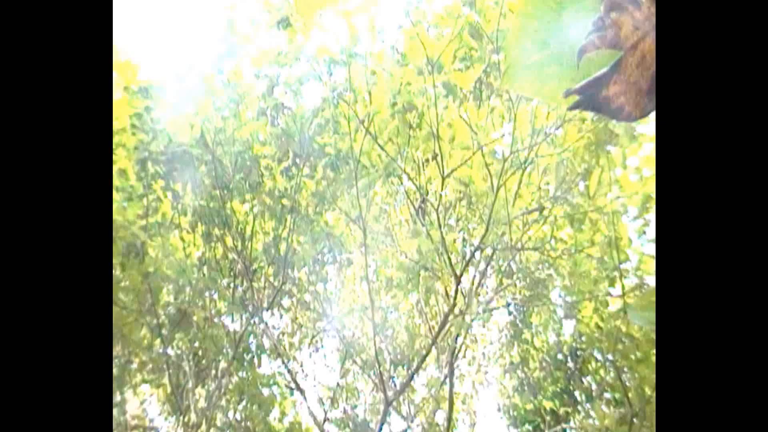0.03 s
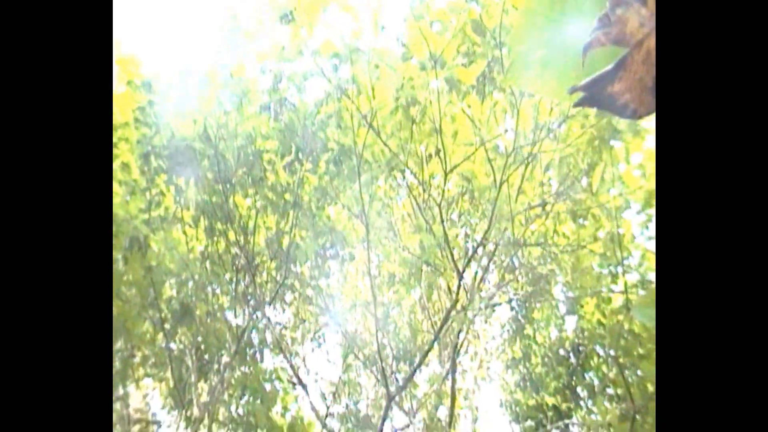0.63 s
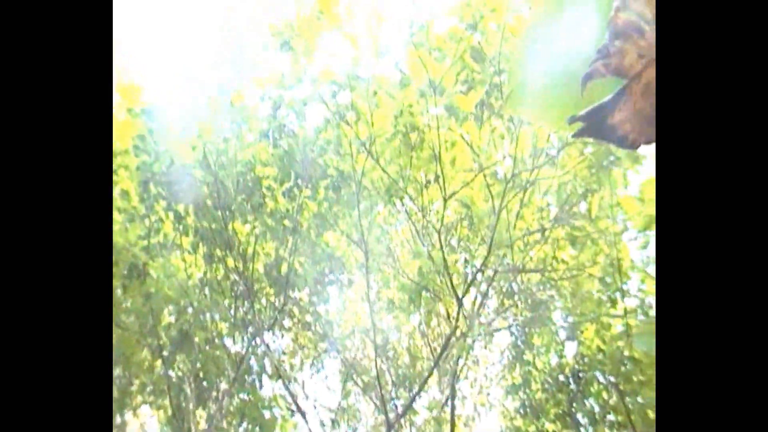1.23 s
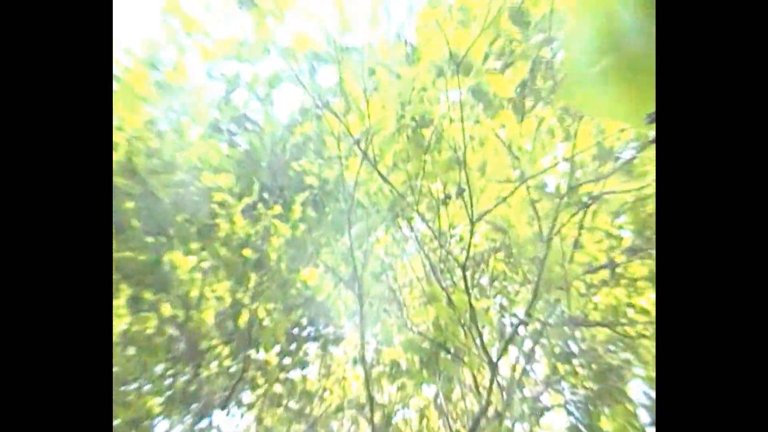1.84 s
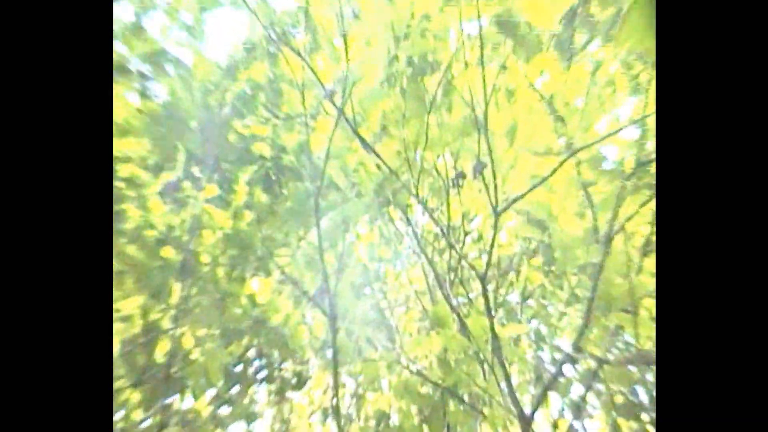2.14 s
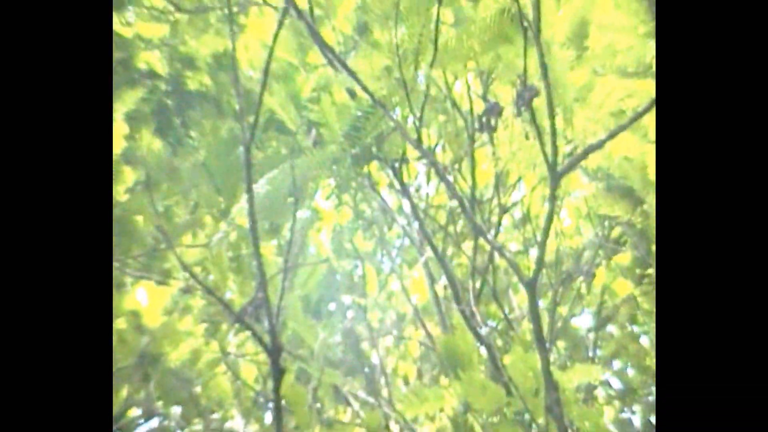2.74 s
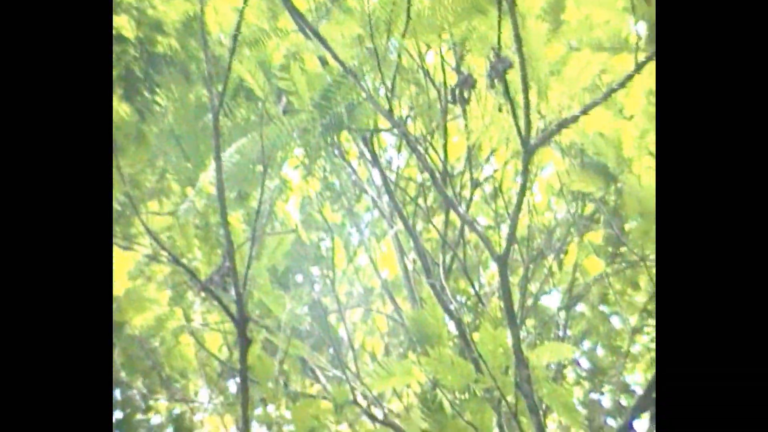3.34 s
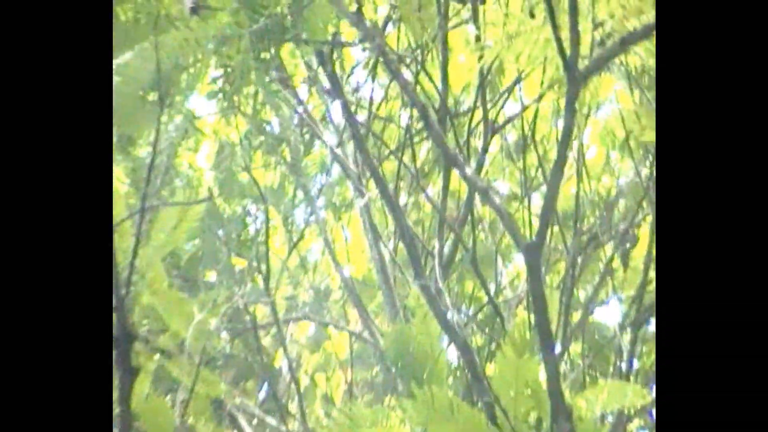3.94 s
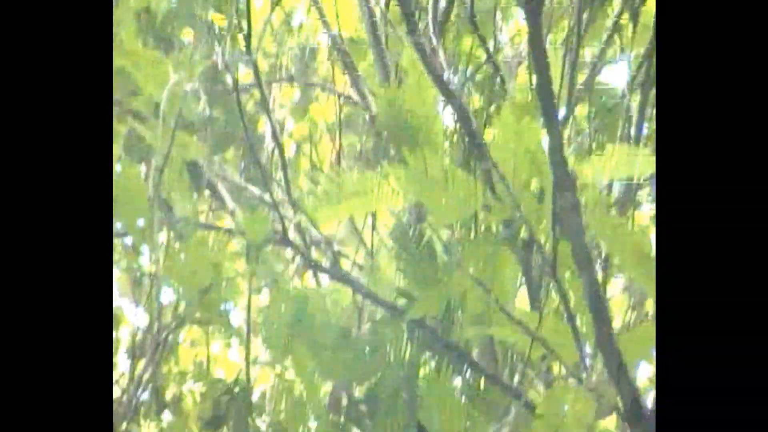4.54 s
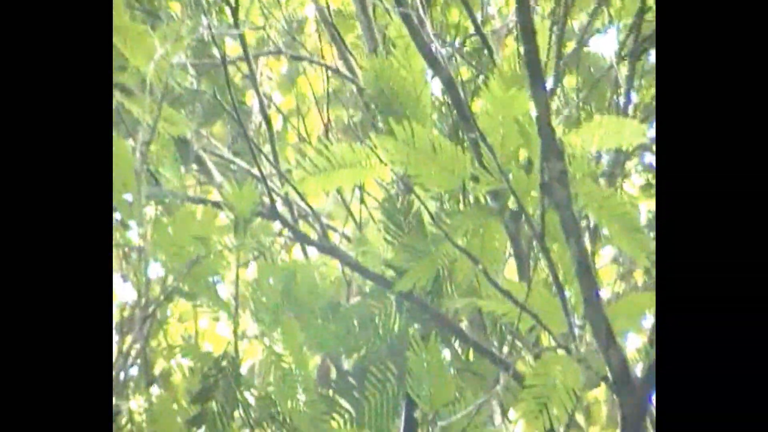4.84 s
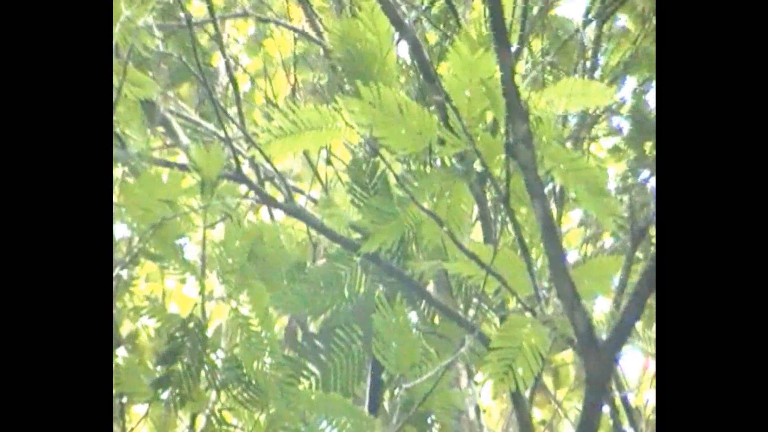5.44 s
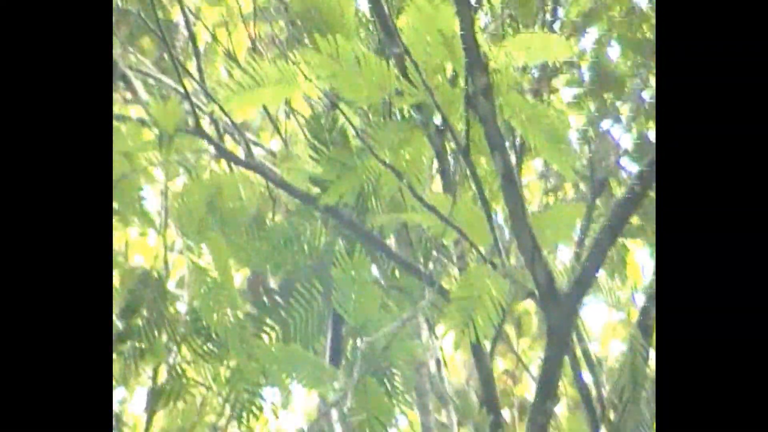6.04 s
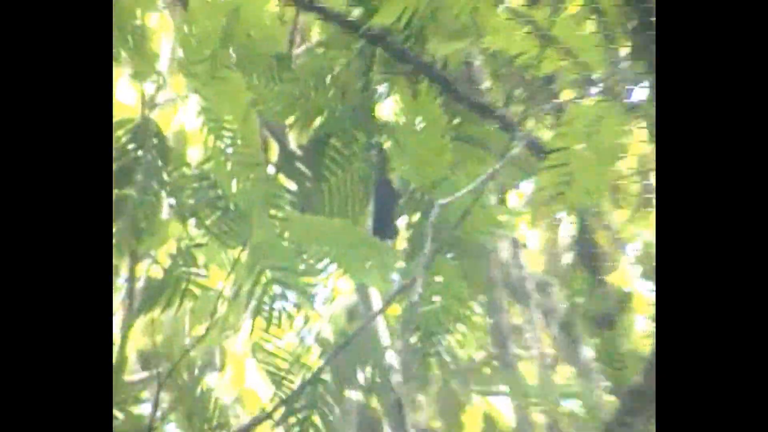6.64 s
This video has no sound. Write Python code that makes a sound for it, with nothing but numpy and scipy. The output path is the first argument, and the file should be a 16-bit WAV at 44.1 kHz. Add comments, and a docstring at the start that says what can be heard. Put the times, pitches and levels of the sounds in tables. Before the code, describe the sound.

Cicadas buzz steadily in a forest, with an evenly chirping insect and softly murmuring leaves. Slightly to the left, a monkey hoots quietly, then breaks into a run of low, rasping barks, each clearing into a hoot with an echo. A few sharp camera clicks sound close to the microphone. After the calls end, the cicadas carry on under light rubbing and finger knocks.

```python
"""Two soft hoots come first, from a howler monkey up in the trees, working up to a run of hoarse barks.
Each bark starts as a chaotic rasp of the vocal folds and clears into a hoot, sounding through throat
sac and mouth; the forest rings after it. Cicadas buzz their tymbals and another insect chirps evenly.
Right at the microphone the hand-held camera clicks, knocks and rustles; leaves murmur behind it all."""
import sys
import numpy as np
from scipy import signal
from scipy.fft import rfft, irfft
from scipy.io import wavfile
from scipy.ndimage import uniform_filter1d

SR = 44100
rng = np.random.default_rng(int(sys.argv[2]) if len(sys.argv) > 2 else 0)


def put_to_file(sound):
    """Save the sound as 16-bit audio at rate SR, in the file named by the first command-line argument."""
    columns = np.atleast_2d(sound).T  # one column per channel
    safe = np.clip(columns, -1, 1)
    whole_steps = np.round(safe * 32767)
    wavfile.write(sys.argv[1], SR, whole_steps.astype(np.int16))


N = 295029
TIME = np.arange(N) / SR

# Levels in the tables are relative; the functions set the final balance.
# barks from the trees: (start [s], length [s], rasping part [s], top pitch [Hz], swell [dB],
# throat [dB], mouth [dB], rasp [dB])
BARKS = [(1.071, .148, .092, 323.7, 7.5, -20.5, -25.5, -33.5),
         (1.327, .145, .085, 361.4, 7, -19.5, -20.5, -31),
         (1.56, .165, .068, 358.4, 3, -19.5, -22.5, -34.5), (1.829, 0.17, 0.099, 379.2, 3, -19, -19.5, -29),
         (2.097, 0.16, .072, 376.9, 4, -18, -19, -29), (2.41, .193, .082, 391, 4, -17.5, -18.5, -31.5),
         (2.786, 0.16, 0.091, 353.3, 3, -20.5, -22, -36.5)]
# how throat, mouth and rasp rise to a bark's climax and fade: (swell [factor], fall [dB/s])
BARK_ENVELOPES = [(.9, 9), (1.5, 81), (2.6, 125)]
# soft hoots and grunts around the barks:
# (middle [s], length [s], top pitch [Hz], roughness [0-1], throat [dB], mouth [dB], rasp [dB])
HOOTS = [(.312, 0.11, 211.6, 0.05, -31.5, -55, -54), (0.576, 0.087, 217.9, 0.07, -30, -50.5, -49),
         (0.784, 0.056, 199.9, .15, -39, -55, -58), (0.885, .092, 257.2, .2, -25, -34, -33.5),
         (1.008, .045, 137.6, .25, -36, -45, -63), (1.256, .07, 190.6, .6, -32.5, -39.5, -51),
         (2.292, .036, 359.1, .08, -20.5, -25.5, -40), (2.95, 0.041, 238, .3, -29, -32, -46)]
# resonances of throat sac, mouth, round and wide lips, nose: (centre [Hz], width [Hz], level [dB])
THROAT_MODES = [(218, 21, -14), (337.3, 59.2, 7), (440.8, 41.8, 7)]
MOUTH_MODES = [(554.5, 82, -6), (683, 64, -2), (751.8, 40.4, -1), (894, 150, -19.5), (1324, 36, -47)]
ROUND_LIP_MODES = [(1358, 54, 0), (3346, 127, 1.5), (3557, 72, 6.5), (3950, 58, -21), (5030, 91, -8),
                   (5890, 190, -6.5)]
WIDE_LIP_MODES = [(1337, 81, 2), (2350, 130, -12), (2613, 53, -12), (3420, 210, -7), (3894, 78, 4.5),
                  (4078, 94, 3.5), (5170, 143, 3.5), (5370, 150, 1), (6000, 160, -7)]
NASAL_MODES = [(2120, 66, 0)]
# the moving mouth: (time [s], opening [0-1], tuning of upper resonances [factor], nasal ring [dB])
MOUTH_MOTION = [(.88, 0.13, 0.93, 3), (1.14, 0.15, 0.96, -8), (1.42, 0.17, 0.96, -3.5),
                (1.57, 0.64, 0.95, -10), (1.86, 0.98, 0.97, -9), (2.25, 0.92, 0.98, -9.5),
                (2.42, 0.18, 0.96, 5.5), (2.6, 0.24, 1.0, 12.5), (2.85, 0.05, 0.99, 3)]

# clicks of the camera case, right at the microphone:
# (time [s], peak [dB], lower ring [Hz], upper ring [Hz], upper ring level [dB], t60 [s])
CASE_CLICKS = [(.692, -8, 2350, 7000, -2, 0.011), (1.529, -13, 3070, 6860, 1, 0.013),
               (1.6271, -6.5, 2950, 8163, 5, 0.021), (4.307, -1.5, 3131, 7469, 1, 0.01)]
# knocks on the case, among them the duller body of the loud click at 4.307 s: (time [s], peak [dB], ring [Hz],
# t60 [s])
CASE_KNOCKS = [(.614, -23, 690, 0.026), (0.711, -35, 69.5, 0.088), (1.243, -32, 850, 0.031),
               (1.570, -11, 890, 0.004), (2.163, -31.5, 149.8, 0.02), (4.069, -34.5, 2493, 0.026),
               (4.19, -35, 700, 0.015), (4.3078, -14, 1400, 0.0096), (4.551, -22.5, 1630, 0.027),
               (4.592, -40, 970, 0.014), (4.6366, -22, 1220, 0.0081), (4.751, -31.5, 1520, 0.021),
               (4.88, -23.5, 2070, 0.015), (4.945, -40, 4500, 0.047), (5.087, -30.5, 1900, 0.012),
               (5.768, -42.5, 500, 0.04), (6.608, -39, 1070, 0.012)]
# strokes of sleeve and hand: (peak time [s], rise [s], fall [s], body [dB], hiss [dB])
RUB_STROKES = [(.17, 0.0077, 0.053, -53.5, -48), (.268, 0.014, 0.029, -42.5, -42.5),
               (3.691, 0.068, 0.095, -54.5, -43.5), (3.89, 0.22, 0.96, -55, -54),
               (4.255, 0.11, 0.3, -55, -48), (4.445, 0.077, 0.17, -41, -44), (4.585, .09, 0.077, -68, -44),
               (4.74, 0.11, 0.12, -53.5, -57), (4.878, 0.0047, .06, -47, -42.5),
               (4.95, 0.048, 0.026, -51, -42), (5.255, 0.33, 0.14, -56.5, -45),
               (6.53, .02, 0.011, -57, -43.5), (6.605, 0.018, .08, -55, -58)]
# spectra of the rubbing's body and hiss: (frequency [Hz], level [dB])
RUB_BODY_SPECTRUM = [(60, -12), (160, -8.5), (300, -2.5), (550, 0.5), (950, 2), (1400, -2), (2200, -7),
                     (3500, -9.5)]
RUB_HISS_SPECTRUM = [(1500, -4.5), (2800, 0.5), (4500, 4), (7000, 3), (9000, -4.5), (11500, -13),
                     (13000, -56)]

# tymbals: the near cicada's two rings, then the second cicada's: (centre [Hz], width [Hz], level [dB])
TYMBAL_MODES = [(6478, 153, -2), (6744, 290, 4.5), (7220, 190, -0.5)]
# phrases of the near cicada: (middle [s], length [s], lower ring [dB], main ring [dB])
CICADA_PHRASES = [(0.482, 0.36, -47, -48.5), (1.438, 0.45, -48, -52.5), (2.05, 0.6, -49, -56),
                  (2.713, 0.53, -46, -55), (3.267, 0.27, -55, -50.5), (3.679, 0.64, -55.5, -52),
                  (4.101, 0.26, -48, -60), (4.464, 0.39, -52, -50), (4.96, 0.23, -48, -59),
                  (5.55, 0.36, -50.5, -50), (6.222, 0.23, -47, -51.5), (6.675, .2, -45.5, -54.5)]
# the second, higher cicada: (time [s], level [dB])
SECOND_CICADA_LEVEL = [(.2, -59), (1.0, -55), (2.4, -53), (3.2, -58), (4.4, -61), (5.4, -55), (6.5, -50.5)]
# resonances of the chorus farther back and of the chirping insect: (centre [Hz], width [Hz], level [dB])
CHORUS_MODES = [(7470, 49, 2), (7780, 290, -8.5), (8120, 55, -0.5), (8230, 450, -11.5)]
CHIRP_MODES = [(3655, 770, -9), (4020, 260, -0.5), (4350, 2100, -15)]
# the chirping insect fading away: (time [s], level [dB])
CHIRP_LEVEL = [(.2, -48), (3.0, -49), (4.1, -50.5), (4.5, -56.5), (5.0, -71)]

# breeze in the leaves: (time [s], level [dB])
BREEZE_LEVEL = [(.2, -51.5), (2.5, -49), (4.6, -53), (5.8, -53), (6.69, -54)]
# spectra of the leaves' murmur and of a thin hiss: (frequency [Hz], level [dB])
LEAF_SPECTRUM = [(15, -26), (25, 0), (64, -1.5), (124, -1.5), (143, -5.5), (242, -2.5), (349, -5),
                 (429, -6.5), (516, -8.5), (958, -7), (1260, -11.5), (1520, -12.5), (6000, -13.5),
                 (7800, -38), (13200, -120)]
HISS_SPECTRUM = [(5000, -30), (6500, 3.5), (8500, 1), (11300, -5), (12200, -30)]
# drones far off in the forest: (centre [Hz], width [Hz], level [dB])
DRONE_MODES = [(962, 160, -6.5), (3880, 880, -9.5)]


def monkey(jitter=.24, shimmer_db=6, breath=.2, flutter_db=4.5):
    """Up in the trees, vocal folds swing between chaos and a clean tone, driving throat sac and mouth."""
    pitch, rough, throat_gain, mouth_gain, rasp_gain = calls()
    cycles = np.cumsum(pitch * np.exp(jitter * rough * drift(120) + .012 * drift(30))) / SR
    closures = np.diff(np.floor(cycles), prepend=0) * from_db(shimmer_db * rough * drift(126))
    # air rushes through in puffs, one for each opening of the folds
    puffs = rng.standard_normal(N) * (1 + np.cos(2 * np.pi * cycles))
    folds = hold_level(closures, .0093) + breath * (.5 + rough) * rms_one(puffs)
    # the sac sings a near sine when the folds are steady and growls when they are not
    tone = np.sqrt(2) * np.sin(2 * np.pi * cycles) * from_db(flutter_db * drift(23.2))
    growl = hold_level(cut(resonate(folds, THROAT_MODES), 200, "high", order=8), .02)
    throat = hold_level((1 - rough) * tone + rough * growl, .027)
    mouth = resonate(folds + .66 * puffs, MOUTH_MODES, order=2)
    mouth = hold_level(mouth + .053 * cut(folds, [450, 1300], "band"), .072)
    rasp = lips_and_nose(folds + .5 * puffs)
    rasp_gain = np.minimum(rasp_gain, .51 * mouth_gain)  # the rasp only sounds when the mouth does
    voice = throat_gain * throat + from_db(-1.5) * mouth_gain * mouth + rasp_gain * rasp
    throb = from_db(.76 * drift(51))  # the whole sac throbs under the strain
    return cut(throb * voice, [125, 9000], "band", order=3)


def lips_and_nose(hoarse):
    """The rasp rings in lips and nose; opening the mouth shifts the weight to higher resonances."""
    opening, tuning, nasal_db = in_time(MOUTH_MOTION)
    rounded = (1 - opening) * glide(hoarse, ROUND_LIP_MODES, tuning)
    wide = opening * glide(hoarse, WIDE_LIP_MODES, tuning)
    nasal = from_db(nasal_db) * glide(hoarse, NASAL_MODES, tuning)
    broadband = .086 * cut(hoarse, [1000, 7000], "band", order=4)
    return cut(hold_level(rounded + wide + nasal + broadband, .018), 8000, "low", order=6)


def calls(growl_hz=239.4):
    """All calls in a row; the strongest in the throat at each moment sets pitch and roughness."""
    pitch, rough, levels, strongest = growl_hz, 0, 0, 0
    barks = [bark(growl_hz, *row) for row in BARKS]
    hoots = [hoot(*row) for row in HOOTS]
    for hz, roughness, *gains in barks + hoots:
        leads = gains[0] > strongest
        pitch = np.where(leads, hz, pitch)
        rough = np.where(leads, roughness, rough)
        levels = np.maximum(levels, gains)
        strongest = levels[0]
    return pitch, rough, *levels


def bark(growl_hz, start_s, length_s, rasping_s, top_hz, swell_db, *levels_db):
    """Pitch, roughness and three gains of a bark: a swelling rasp that clears into an arching hoot."""
    arch_top_s, arch_width_s = .124, .07
    attack_s, release_s, clearing_s = .009, .03, .009
    t = np.clip(TIME - start_s, -1, 1)
    pitch = growl_hz + (top_hz - growl_hz) * np.exp(-((t - arch_top_s) / arch_width_s) ** 2)
    cleared = .5 + .5 * np.tanh((t - rasping_s) / clearing_s)
    rough = .92 - .84 * cleared
    gate = np.clip(t / attack_s + .5, 0, 1) * np.clip((length_s - t) / release_s + .5, 0, 1)
    climax_s = rasping_s - .02  # loudest just before it clears
    to_go = np.clip(1 - t / climax_s, 0, 1)
    past_s = np.maximum(t - climax_s, 0)
    gains = [gate * from_db(db - share * swell_db * to_go - fall * past_s)
             for db, (share, fall) in zip(levels_db, BARK_ENVELOPES)]
    return pitch, rough, *gains


def hoot(middle_s, length_s, top_hz, rough, *levels_db, edge_db=6, sag=.06):
    """Pitch, roughness and three gains of a soft hoot: level and pitch rise and fall together."""
    away = from_middle(middle_s, length_s)
    pitch = top_hz * (1 - sag * np.minimum(away, 2))
    swell = from_db(-edge_db * away ** 1.5)
    return pitch, rough, *(from_db(db) * swell for db in levels_db)


def forest(voice, tail_db=-13, trunks_db=-17, low_t60=1.57, mid_t60=1.8, leaf_t60=1.0, trunk_t60=1.0):
    """Near trunks scatter a quick echo and leaves a bright one; from far trees the low hoot carries."""
    t = TIME[:2 * SR]
    noise = stereo_noise(1.0)[:, :len(t)] * np.clip(t / .074, 0, 1)
    low = cut(noise, [340.1, 441.4], "band") * from_db(-60 * t / low_t60)
    middle = cut(noise, [600, 2500], "band") * from_db(-9 - 60 * t / mid_t60)
    leaves = cut(noise, 2000, "high") * from_db(2 - 60 * t / leaf_t60)
    trunks = cut(stereo_noise(.95)[:, :len(t)], 204, "high") * from_db(-60 * t / trunk_t60) * (t > .006)
    # scaled so that a longer decay adds no energy
    tail = (low + middle + leaves) / np.sqrt(SR * low_t60 / np.log(1e6))
    trunks /= np.sqrt(SR * trunk_t60 / np.log(1e6))
    echo = from_db(tail_db) * tail + from_db(trunks_db) * trunks
    return signal.fftconvolve(voice[None], echo, axes=1)[:, :N]


def camera_taps(crack=.18, knock_edge=.089):
    """Right at the microphone, clicks ring the plastic case; finger knocks are duller."""
    out = np.zeros((2, N))
    for time_s, db, low_hz, high_hz, high_db, t60 in CASE_CLICKS:
        span, hit = contact(time_s, t60, spread=.73)
        ring = resonate(hit, [(low_hz, 1800, 0), (high_hz, 2800, high_db)])
        click = cut(ring + crack * cut(hit, [1000, 9000], "band"), 11000, "low", order=8)
        out[:, span] += from_db(db) * click / np.abs(click).max()
    for time_s, db, hz, t60 in CASE_KNOCKS:
        span, hit = contact(time_s, t60, spread=.38)
        knock = cut(hit, [hz / 2.13, hz * 1.36], "band") + knock_edge * cut(hit, [60, 6000], "band")
        out[:, span] += from_db(db) * knock / np.abs(knock).max()
    return out


def contact(time_s, t60, spread):
    """A brief touch on the case: its span of samples and a stereo burst of noise that dies at once."""
    t = TIME[:SR // 20]
    start = int(time_s * SR)
    mid, side = rng.standard_normal((2, len(t)))
    burst = (mid + spread * side * [[1], [-1]]) * from_db(-60 * t / t60)
    return slice(start, start + len(t)), burst


def rubbing(edge_db=12, grain_db=3):
    """Cloth and skin catch and slip beside the microphone; each stroke builds up and dies away."""
    body_gain = hiss_gain = 0
    for peak_s, rise_s, fall_s, body_db, hiss_db in RUB_STROKES:
        away = np.maximum((peak_s - TIME) / rise_s, (TIME - peak_s) / fall_s)
        stroke = from_db(-edge_db * np.minimum(away, 10))
        body_gain = np.hypot(body_gain, from_db(body_db) * stroke)
        hiss_gain = np.hypot(hiss_gain, from_db(hiss_db) * stroke)
    grip = rms_one(from_db(grain_db * drift(115)))
    body = from_db(4) * body_gain * colour(stereo_noise(.93), RUB_BODY_SPECTRUM)
    hiss = hiss_gain * colour(stereo_noise(.59), RUB_HISS_SPECTRUM)
    return grip * (body + hiss)


def cicadas(idle_db=-57.5, edge_db=5.5, buzz_db=1.5, chorus_db=-54):
    """Tymbals ring: a near singer swells in phrases, a second holds its note, a chorus lies behind."""
    lower = main = from_db(idle_db)
    for middle_s, length_s, lower_db, main_db in CICADA_PHRASES:
        swell = from_db(-edge_db * from_middle(middle_s, length_s))
        lower = np.maximum(lower, from_db(lower_db) * swell)
        main = np.maximum(main, from_db(main_db) * swell)
    second = from_db(in_time(SECOND_CICADA_LEVEL)[0])
    singers = 0
    for gain, (hz, width, db) in zip([lower, main, second], TYMBAL_MODES):
        buzz = from_db(db - buzz_db * drift(60))
        ring = resonate(stereo_noise(.53), [(hz, width, db)], order=2)
        singers += gain * buzz * hold_level(ring, .16)
    chorus_gain = from_db(chorus_db + drift(40))
    return singers + chorus_gain * rms_one(resonate(stereo_noise(.55), CHORUS_MODES, order=2))


def chirping_insect(peak_s=.21, period_s=.1793, sharpness=1.36):
    """An insect rasps out evenly spaced chirps, then fades away."""
    strokes = (.5 + .5 * np.cos(2 * np.pi * (TIME - peak_s) / period_s)) ** sharpness
    teeth = from_db(2 * drift(120))
    rasp = rms_one(teeth * resonate(stereo_noise(.82), CHIRP_MODES, order=2))
    return from_db(in_time(CHIRP_LEVEL)[0]) * strokes * rasp


def forest_air(drones_db=-62, hiss_db=-58):
    """The bed of the place: leaves murmuring all around, far-off drones and a thin hiss."""
    breeze = from_db(in_time(BREEZE_LEVEL)[0] + .84 * drift(12))
    leaves = breeze * colour(stereo_noise(.33), LEAF_SPECTRUM)
    drones = from_db(drones_db + drift(8)) * rms_one(resonate(stereo_noise(.85), DRONE_MODES, order=2))
    return leaves + drones + from_db(hiss_db) * colour(stereo_noise(.074), HISS_SPECTRUM)


def from_db(db):
    """Decibels as an amplitude factor."""
    return 10 ** (np.asarray(db) / 20)


def rms_one(x):
    """Scales a sound to rms 1."""
    return x / np.sqrt(np.mean(x ** 2) + 1e-20)


def in_time(rows):
    """Each column of a curve at every sample."""
    times, *columns = np.transpose(rows)
    return [np.interp(TIME, times, column) for column in columns]


def from_middle(middle_s, length_s):
    """Squared distance in time from the middle of a sound: 1 at either end."""
    return np.minimum((2 * (TIME - middle_s) / length_s) ** 2, 100)


def drift(rate_hz, step=40):
    """A smooth random wander of rms 1, mostly slower than the rate."""
    pole = np.exp(-2 * np.pi * step * rate_hz / SR)
    noise = rng.standard_normal(N // step + 2002)
    slow = signal.lfilter([1], [1, -2 * pole, pole * pole], noise)[2000:]
    return np.interp(np.arange(N) / step, np.arange(len(slow)), rms_one(slow))


def cut(x, hz, kind, order=2):
    """A low-, high- or band-pass filter."""
    sections = signal.butter(order, np.clip(hz, 10, .45 * SR), kind, fs=SR, output="sos")
    return signal.sosfilt(sections, x + 1e-18)


def resonate(x, modes, order=1):
    """Parallel resonances of alternating sign; order 2 gives steeper skirts."""
    return sum((-1) ** k * from_db(db) * cut(x, [hz - width / 2, hz + width / 2], "band", order)
               for k, (hz, width, db) in enumerate(modes))


def glide(x, modes, tuning):
    """Resonances whose centres move together: shift down, low-pass, shift back."""
    phase_per_hz = 2 * np.pi * np.cumsum(tuning) / SR
    out = 0
    for hz, width, db in modes:
        carrier = np.exp(1j * hz * phase_per_hz)
        out += from_db(db) * 2 * np.real(carrier * cut(x / carrier, width / 2, "low"))
    return out


def hold_level(x, window_s):
    """Holds a sound at rms 1, keeping flutter faster than the window."""
    size = int(window_s * SR)
    power = uniform_filter1d(uniform_filter1d(x * x, size), size)
    return x / np.sqrt(np.abs(power) + 1e-14)


def stereo_noise(correlation):
    """White noise with a given left-right correlation."""
    mid, side = rng.standard_normal((2, N))
    return np.sqrt(1 + correlation) * mid + np.sqrt(1 - correlation) * side * [[1], [-1]]


def colour(x, spectrum):
    """Gives noise a spectrum that falls away beyond its ends; rms 1."""
    hz, db = np.transpose(spectrum)
    bins_hz = np.maximum(np.arange(N // 2 + 1) * SR / N, 1)
    knots_hz = np.r_[hz[0] / 2, hz, hz[-1] * np.sqrt(2)]
    shape_db = np.interp(np.log(bins_hz), np.log(knots_hz), np.r_[db[0] - 20, db, -80])
    return rms_one(irfft(rfft(x) * from_db(shape_db), N))


def pan(x, left_db):
    """Places a sound by the left channel's lead over the right."""
    return x * from_db([[left_db / 2], [-left_db / 2]])


def scene():
    """From the microphone: the monkey a little to the left, insects near the centre, handling close by."""
    voice = monkey()
    return (pan(voice + forest(voice), left_db=2.2)
            + pan(cicadas(), left_db=.3)
            + chirping_insect()
            + pan(camera_taps(), left_db=-.5)
            + pan(rubbing() + forest_air(), left_db=1.5))


def record(dry, ceiling=.48, cutoff_hz=16000):
    """The camera's microphone opens after a moment, overloads on loud clicks and briefly drops out once."""
    clipped = dry / (1 + (dry / ceiling) ** 8) ** (1 / 8)
    live = np.interp(TIME, [.155, .17, 6.26, 6.264, 6.281, 6.285], [0, 1, 1, .05, .05, 1])
    return signal.sosfilt(signal.cheby2(12, 70, cutoff_hz, fs=SR, output="sos"), clipped * live)


dry = scene()
out = record(dry)
put_to_file(out)
```